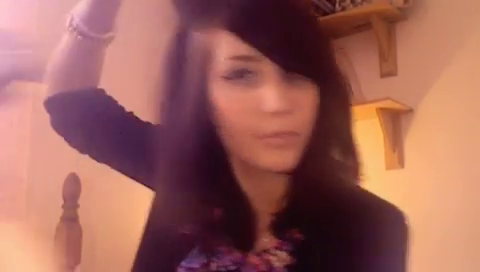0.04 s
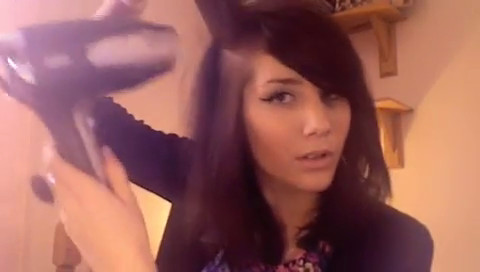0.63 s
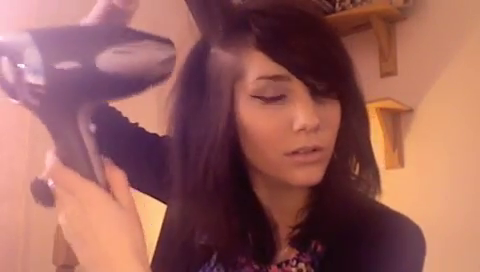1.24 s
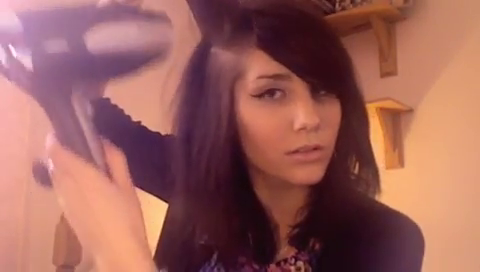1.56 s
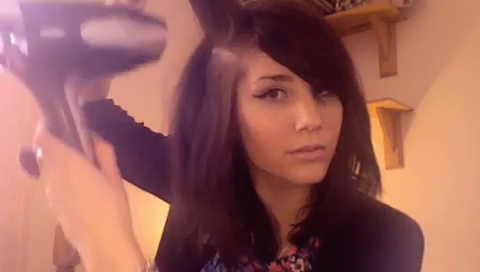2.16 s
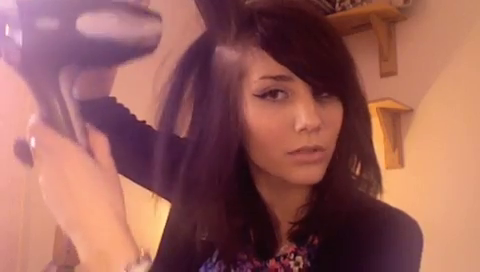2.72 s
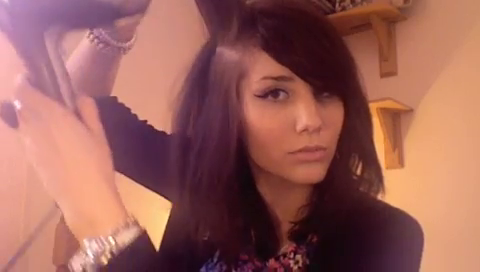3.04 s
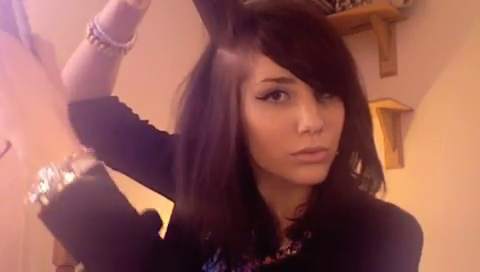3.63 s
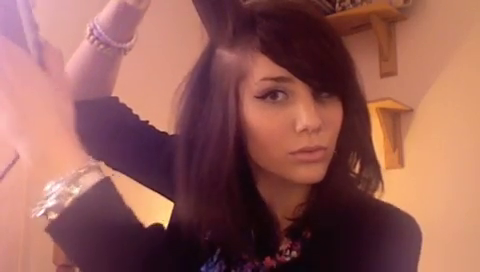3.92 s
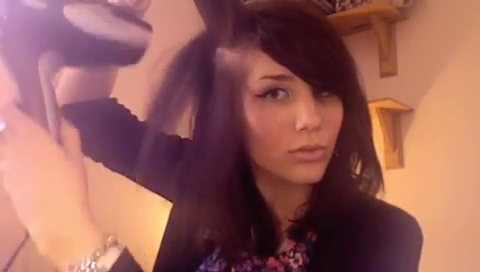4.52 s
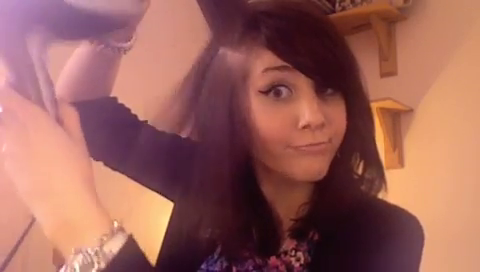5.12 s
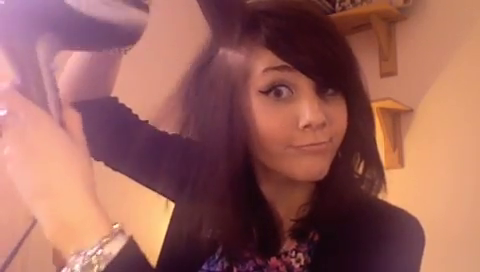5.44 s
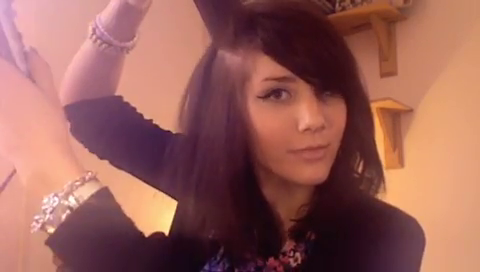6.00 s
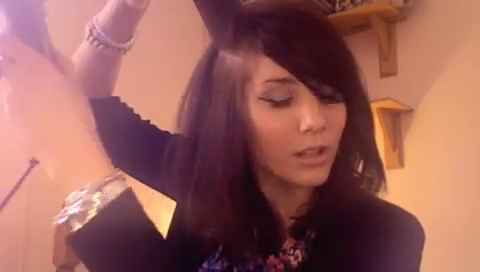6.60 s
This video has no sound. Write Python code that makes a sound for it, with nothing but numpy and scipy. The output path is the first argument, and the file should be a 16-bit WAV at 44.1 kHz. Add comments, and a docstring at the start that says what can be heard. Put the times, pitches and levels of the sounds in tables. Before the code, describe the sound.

The sound opens on a quiet room with a soft hiss, a low hum and a faint, high electrical whistle that pulses rapidly throughout. Between about 0.1 and 0.25 seconds a hand makes a few light clicks on a plastic hair dryer. At 0.4 seconds the switch snaps with a dull knock and a slight ring. The fan spins up on low with a rising whine and a rush of air that rattles briefly, then smooths out. At about 1.5 seconds the dryer goes to high, growing louder and higher and settling at full speed by around 2.5 seconds. It then blows loudly and steadily near the microphone, with a wavering whine over the air. The colour of the rush shifts gently as the nozzle moves, around 2, 3, 4.4 and 5.7 seconds. It is still running at the end, near 7 seconds.

```python
"""A quiet room hums, and a faint electrical whistle pulses all the way through. A hand picks at a hair
dryer with a few clicks, then the switch snaps to low at about 0.4 s and the housing rings. The four-bladed
fan spins up: air rushes through the housing, rattling at first, and the blades give a rising whine.
At about 1.5 s the dryer goes to high and grows louder and higher. It is then moved about over the hair,
and the colour of the rush shifts with the aim of the nozzle."""
import sys
import numpy as np
from scipy import signal
from scipy.fft import rfft, irfft
from scipy.io import wavfile
from scipy.ndimage import uniform_filter1d

SR = 44100
rng = np.random.default_rng(int(sys.argv[2]) if len(sys.argv) > 2 else 0)


def unload_wav(signal):
    """Save mono or channel-first audio to the path in sys.argv[1] as 16-bit WAV at rate SR, clipped to [-1, 1]."""
    wavfile.write(
        sys.argv[1],
        SR,
        np.round(np.clip(np.atleast_2d(signal).T, -1, 1) * 32767).astype(np.int16),
    )


N = 298116
TIME = np.arange(N) / SR

# The room's hiss. Each row: frequency in Hz, relative strength in dB.
ROOM_COLOUR = [(15, -59), (25, -31), (55, -38), (82, -9), (246, -19.5), (1110, -21.5), (1240, -28),
               (1340, -25), (1620, -25.5), (6730, -36), (7910, -36), (8580, -32), (15500, -40)]
# The room's hums. Each row: pitch in Hz, level in dB.
ROOM_HUMS = [(90.3, -55.5), (1039, -73), (1314, -66)]
# Handling clicks, then the switch. Each row: start in seconds, relative level in dB,
# share of dull knock from 0 to 1, fade time in seconds.
CLICKS = [(.0900, -49, .4, 0.0018), (0.1358, -28, 0, .002), (0.14, -33, 0, .005), (.1648, -25, 0, 0.0013),
          (.1684, -39, .04, .002), (.1834, -40, .06, .005), (0.233, -35, 0, .0012),
          (.4125, -34, .15, .0015), (0.4314, -22, 0.94, 0.0015)]
# A bright tick and a dull plastic knock. Each row: frequency in Hz, relative strength in dB.
TICK_COLOUR = [(500, -27), (2500, -17), (4500, -4), (6500, 0), (10000, -2), (13000, -2), (16000, -8)]
KNOCK_COLOUR = [(400, -23), (690, -6), (900, -6), (1200, -4), (1450, 8), (2100, -11), (3400, -4),
                (4700, -9), (5300, -18), (7000, -18), (16000, -26)]
# Speeding up to high: a quick kick, the main climb, a slow creep.
# Each row: share of the step from 0 to 1, settling time in seconds.
RUN_UP = [(.3, .062), (.675, .26), (.025, 2.6)]
# Where the nozzle points. Each row: time in seconds, aim (0 close to the head, 1 level, 2 raised, 3 down).
NOZZLE_AIM = [(0, 0), (1.5, 0), (2.0, 1), (2.8, 1), (3.15, 2), (4.22, 2), (4.48, 3), (5.55, 3), (5.85, 2),
              (6.76, 2)]
# The loudness that each of those four aims adds, in dB.
AIM_DB = [0.62, 0.31, -1.17, -0.18]
# The blade tone and the tone an octave above. Each row: time in seconds, relative level in dB.
BLADE_LEVELS = [(0.6, -5), (1.08, 2.4), (1.2, -8), (1.36, 1), (1.52, -3), (1.96, -4.5), (2.12, 3.5),
                (2.36, -14.5), (2.52, -5.4), (2.84, -4), (3.24, 4), (4.24, 5.5), (4.48, -0.4), (6.08, 2.5),
                (6.2, 0), (6.32, 4.5), (6.72, 4)]
OCTAVE_LEVELS = [(1.0, -7.3), (1.25, -1), (1.55, -15), (2.45, -8.5), (2.85, -20.0), (3.35, -8.5),
                 (3.55, -12), (3.72, -4.5), (3.95, -14), (4.35, -15), (4.65, -6.5), (4.88, -15),
                 (5.1, -5.0), (5.58, -13), (5.85, -3.9), (6.15, -7), (6.7, -10.8)]
# Weaker rotor tones. Each row: cycles per turn of the shaft, level in dB against the air at full speed.
ROTOR_TONES = [(1, -22.5), (2, -22.5), (3, -15.5), (5, -9.5), (6, -21), (12, -15), (20, -24)]
# Swirling air at full speed. Each row: frequency in Hz, relative strength in dB.
AIR_COLOUR = [(30, -50), (110, -34), (250, -21.5), (500, -11.5), (750, -0.5), (1050, -8), (1500, -2.5),
              (2100, -12.5), (2600, -12.5), (4000, -10), (6500, -17), (8000, -19), (10000, -27.5),
              (13000, -27.5), (15800, -31.5)]
# Peaks and dips from the housing and room. Each row: centre in Hz, width in Hz, boost or cut in dB.
HOUSING_PEAKS = [(214, 15, 6), (382, 15, -15), (395, 18, 6.5), (438, 22, -8), (538, 53, 1.5), (600, 74, -4),
                 (674, 13.5, 3.5), (777.6, 41, -7.5), (806.5, 32, 7), (890, 5, -6), (912, 21, 6.5),
                 (931, 17, -10), (1055, 12, -12.5), (1046.5, 19, 11), (1224, 31, -11), (1352, 122, 3.5),
                 (1435, 21, 3), (1480, 22, -0.5), (1541, 17, 7.5), (1653, 18, -6), (1673, 22, 6.5),
                 (1887, 12, 12.5), (1917, 48, -12.5), (2147, 70, -6.5), (2170, 13, 15.5), (2370, 60, 5),
                 (2488, 28, 10.5), (2607, 56, 4), (2970, 270, -1.9)]
# Peaks and dips that each aim adds. Each row: centre in Hz, width in Hz, boost or cut in dB.
CLOSE_PEAKS = [(1460, 200, -3), (1720, 150, 4.5), (2310, 120, 0.5), (3000, 430, 5.5), (3550, 190, -6),
               (4400, 290, 3), (5000, 380, -3), (5800, 290, 4), (7200, 380, 4.5), (7800, 250, -2),
               (8300, 400, 1), (9800, 400, 1)]
LEVEL_PEAKS = [(1440, 240, -0.5), (3050, 440, 3.5), (3660, 450, -5), (3760, 150, 5), (4090, 490, 3.5),
               (4780, 310, -4), (5360, 130, 2), (5710, 200, 2.6), (6200, 200, -2.5), (6840, 450, 3.5),
               (7650, 250, -1), (13210, 450, -7)]
RAISED_PEAKS = [(2730, 190, 3.5), (3220, 520, -2.5), (3830, 250, 3.5), (4320, 320, -3.5), (5770, 400, -4.5),
                (6270, 155, 1.5), (8200, 243, -2.5), (9100, 376, -1.5), (11300, 310, 2.5)]
DOWN_PEAKS = [(1736, 190, 1.5), (2200, 339, -1.5), (2800, 280, 4), (3491, 300, -6), (3887, 670, 3),
              (4684, 205, -5.5), (5298, 420, 3.5), (6011, 325, -5), (6700, 624, 2)]
# A slow fan hisses less. Each row: centre in Hz, width in Hz, cut in dB.
SLOW_HISS_DIP = [(6040, 4000, -3.2)]

BLADES, LOW_HZ, FULL_HZ = 4, 911.6, 1162  # the rates count blade passes per second on low and high
LOW_ON_S, HIGH_ON_S, SPIN_UP_S = 0.4, 1.492, 0.494


def gain_of(db):
    """Turns decibels into a factor to multiply by."""
    return 10 ** (np.asarray(db) / 20)


def unit_level(x):
    """Scales a signal to an average (rms) level of 1."""
    return x / np.sqrt(np.mean(x ** 2) + 1e-20)


def follow(rows, t):
    """The value at times t, on straight lines between the rows."""
    return np.interp(t, *np.transpose(rows))


def colour_db(points, hz):
    """The strength in dB at each frequency, joining the points on a pitch scale."""
    f, db = np.transpose(points)
    return np.interp(np.log(hz + 1), np.log(f + 1), db)


def peaks_db(rows, hz):
    """Adds up bell-shaped peaks and dips, in dB."""
    return sum(db * np.exp(-2 * ((hz - f) / width) ** 2) for f, width, db in rows)


def noise(points):
    """Steady noise of a given colour, at level 1."""
    gain = gain_of(colour_db(points, np.fft.rfftfreq(N, 1 / SR)))
    return unit_level(irfft(rfft(rng.standard_normal(N)) * gain, N))


def wander(rate_hz):
    """A random drift of level 1, mostly slower than the given rate."""
    hz = np.fft.rfftfreq(N, 1 / SR)
    return unit_level(irfft(rfft(rng.standard_normal(N)) / (1 + (hz / rate_hz) ** 2), N))


def room(hiss_db=-57):
    """The room gives a soft hiss and steady hums."""
    hums = sum(np.sqrt(2) * gain_of(db) * np.sin(2 * np.pi * hz * TIME) for hz, db in ROOM_HUMS)
    return gain_of(hiss_db) * noise(ROOM_COLOUR) + hums


def electrical_whistle(level_db=-50.0, pitch_hz=8000, period_s=.05843):
    """A camera's data bursts leak into the microphone as a chopped whistle."""
    bursts = (TIME - .034) / period_s % 1 < .56
    whistle = np.sin(2 * np.pi * pitch_hz * TIME)
    return gain_of(level_db) * uniform_filter1d(bursts * 1., size=30) * whistle


def clicks(level_db=-7.0, tail_db=-19.0, tail_s=0.024, rise_s=0.00035):
    """Hand and switch make short bursts, from bright tick to dull knock, that linger briefly in the room."""
    tick, knock, out = noise(TICK_COLOUR), noise(KNOCK_COLOUR), np.zeros(N)
    for start_s, db, dull, decay_s in CLICKS:
        age = np.maximum(TIME - start_s, 0)
        fade = np.exp(-age / decay_s) + gain_of(tail_db) * np.exp(-age / tail_s)
        burst = np.sqrt(1 - dull) * tick + np.sqrt(dull) * knock
        out += gain_of(db + level_db) * np.minimum(age / rise_s, 1) * fade * burst
    return out


def housing_ring(ring_hz=685, level_db=-54.0, decay_s=0.13):
    """The snap of the switch, the last click, leaves the hollow housing ringing."""
    age = np.maximum(TIME - CLICKS[-1][0], 0)
    return gain_of(level_db) * np.exp(-age / decay_s) * np.sin(2 * np.pi * ring_hz * age)


def fan_hz(t):
    """Blade passes per second: the motor pulls against air drag on low, then climbs to full speed."""
    time_on_low = np.maximum(np.minimum(t, HIGH_ON_S) - LOW_ON_S, 1 / SR)
    low = LOW_HZ * np.tanh(time_on_low / SPIN_UP_S)
    to_go = sum(share * np.exp(-np.maximum(t - HIGH_ON_S, 0) / lag_s) for share, lag_s in RUN_UP)
    return FULL_HZ - (FULL_HZ - low) * to_go


def fan_whine(slow_db_per_octave=-9.0, jitter_hz=1.7, shimmer=0.12, fade_db=0.8, weak_below_hz=380):
    """Blades and rotor sing. Gusts shake the tones, and the weaker ones waver as the hand sways."""
    blade_hz = fan_hz(TIME)
    shaft_angle = 2 * np.pi * np.cumsum((blade_hz + jitter_hz * wander(24)) / BLADES) / SR
    tones = [(BLADES, follow(BLADE_LEVELS, TIME)),
             (2 * BLADES, follow(OCTAVE_LEVELS, TIME) + fade_db * wander(2.5))]
    # the off-balance rotor is heard mainly near full speed
    slow_db = slow_db_per_octave * np.log2(FULL_HZ / blade_hz)
    tones += [(per_turn, db + slow_db + fade_db * wander(1.9)) for per_turn, db in ROTOR_TONES]
    whine = np.zeros(N)
    for per_turn, db in tones:
        level = gain_of(db) * (1 + shimmer * wander(14))
        whine += level * np.sin(per_turn * shaft_angle + 2 * np.pi * rng.random())
    # a small fan gives off low notes poorly
    return np.sqrt(2) * whine / np.hypot(1, (weak_below_hz / blade_hz) ** 4)


def mains_rattle(mains_hz=50, depth=0.39, fade_s=0.14):
    """On low the motor gets only half of each mains wave, so the level pulses; this soon dies away."""
    pulse = np.cos(2 * np.pi * mains_hz * (TIME - .602))
    amount = depth * np.exp(-np.maximum(TIME - .6, 0) / fade_s) * (TIME < HIGH_ON_S)
    return np.exp(amount * pulse - amount ** 2 / 2)


def wall_echo_db(hz, t, depth_db=0.3, delay_s=.0034, swing_s=0.00011):
    """A wall echo ripples the treble; the ripple slides as the hand sways."""
    delay = delay_s + swing_s * np.interp(t, TIME, wander(.7))
    return depth_db * np.clip(hz / 3500, 0, 1)[:, None] ** 2 * np.cos(2 * np.pi * np.outer(hz, delay))


def air_rush(bass_db_per_octave=8.0, ripple_db=1.77, flutter_db=0.46, hiss_returns_hz=(620, 680)):
    """Swirling air makes noise, coloured by the housing, the nozzle's aim and the fan's speed."""
    frames = dict(fs=SR, nperseg=4096, noverlap=3072)
    hz, t, spectrum = signal.stft(rng.standard_normal(N), **frames)
    aim = follow(NOZZLE_AIM, t)
    colour = (colour_db(AIR_COLOUR, hz) + peaks_db(HOUSING_PEAKS, hz))[:, None]
    for k, peaks in enumerate([CLOSE_PEAKS, LEVEL_PEAKS, RAISED_PEAKS, DOWN_PEAKS]):
        # the walls give each aim its own fine ripple
        ripple = ripple_db * rng.standard_normal(len(hz)) * np.clip(hz / 2500, 0, 1)
        share = np.clip(1 - abs(aim - k), 0, 1)
        colour = colour + np.outer(peaks_db(peaks, hz) + ripple, share)
    colour += wall_echo_db(hz, t)
    # a slow fan makes a duller rush
    octaves_slow = np.clip(np.log2(FULL_HZ / fan_hz(t)), 0, .9)
    colour += bass_db_per_octave * np.outer(np.interp(hz, [750, 1200, 2200], [1, .25, 0]), octaves_slow)
    gain = gain_of(colour)
    # hold the hiss at an even level, then dip it while the fan is slow
    hiss_band = (hz > 2600) & (hz < 7500)
    gain /= np.sqrt((gain[hiss_band] ** 2).sum(0) / len(hz))
    slow = np.interp(fan_hz(t), hiss_returns_hz, [1, 0])
    gain *= gain_of(np.outer(peaks_db(SLOW_HISS_DIP, hz), slow))
    air = signal.istft(spectrum * gain, **frames)[1][:N]
    return air * gain_of(flutter_db * wander(14))


def dryer_loudness(air_db=-23, air_db_per_octave=17.5, scrape_db=-43.5):
    """Motor scrape sets the level at first, then the air takes over with speed; the aim shifts it a bit."""
    speed = fan_hz(TIME) / FULL_HZ
    air = gain_of(air_db + air_db_per_octave * np.log2(speed))
    aim_db = np.interp(follow(NOZZLE_AIM, TIME), np.arange(len(AIM_DB)), AIM_DB)
    return gain_of(aim_db) * np.hypot(air, gain_of(scrape_db) * speed)


def scene():
    """The dryer, its clicks and the background, the same in both ears."""
    dryer = dryer_loudness() * (air_rush() * mains_rattle() + fan_whine())
    mono = dryer + clicks() + housing_ring() + room() + electrical_whistle()
    return np.array([mono, mono])


def record(dry, cutoff_hz=15830):
    """Cuts away the very highest treble."""
    low_pass = signal.firwin(801, cutoff_hz, window=("kaiser", 9), fs=SR)
    return signal.oaconvolve(dry, low_pass[None], "same")


dry = scene()
out = record(dry)
unload_wav(out)
```